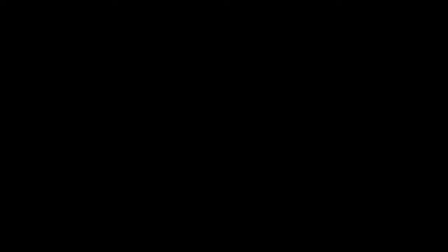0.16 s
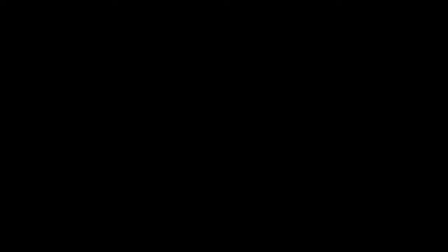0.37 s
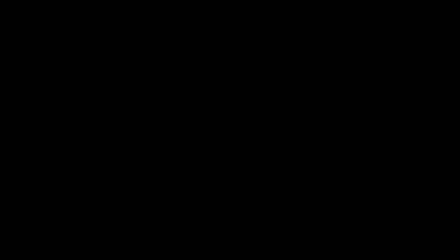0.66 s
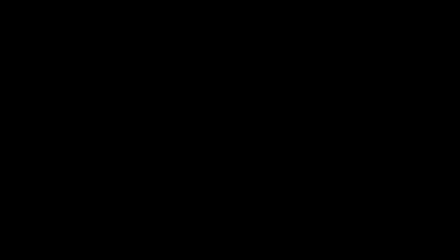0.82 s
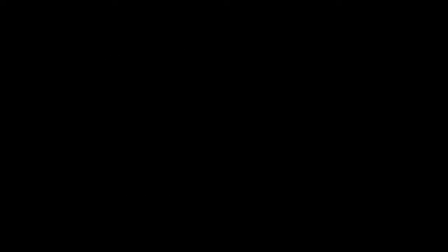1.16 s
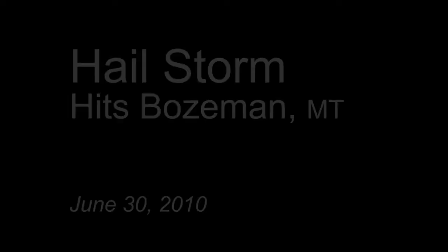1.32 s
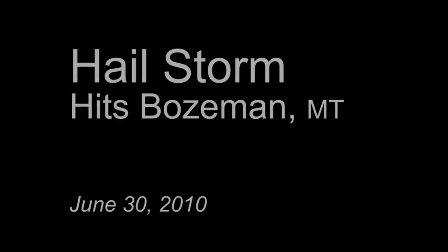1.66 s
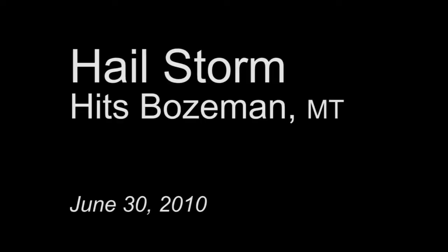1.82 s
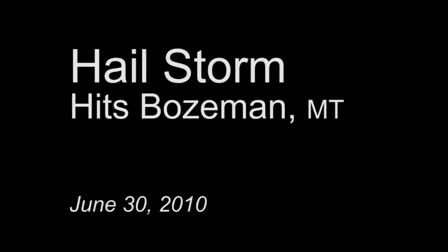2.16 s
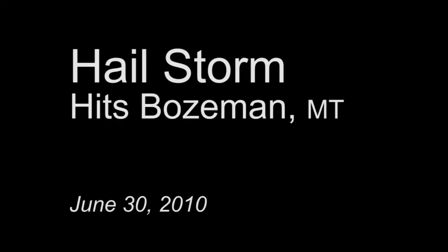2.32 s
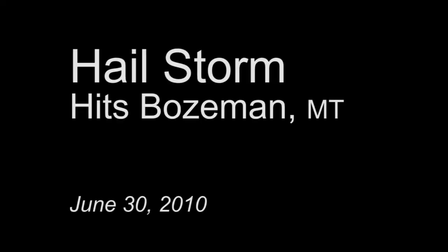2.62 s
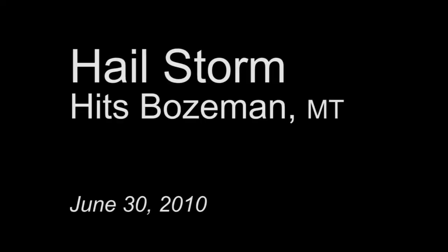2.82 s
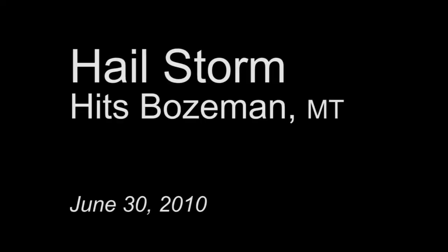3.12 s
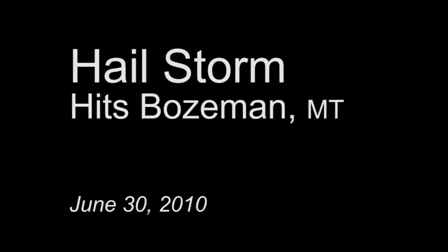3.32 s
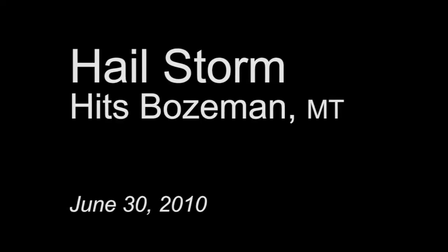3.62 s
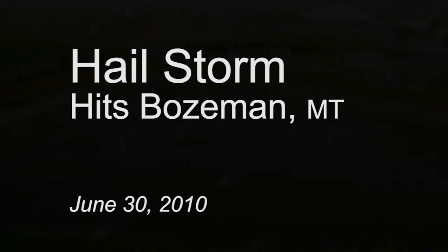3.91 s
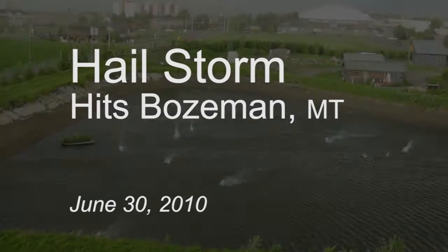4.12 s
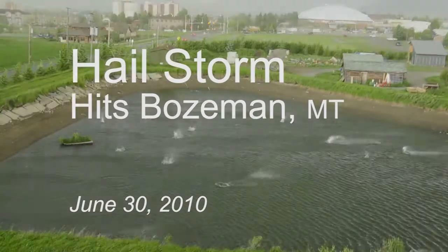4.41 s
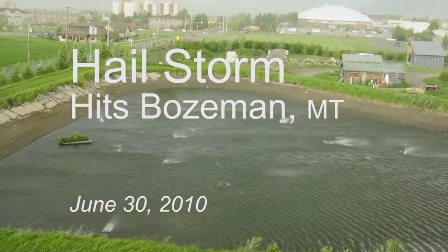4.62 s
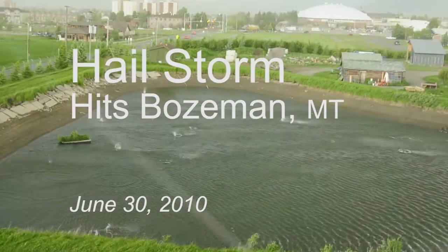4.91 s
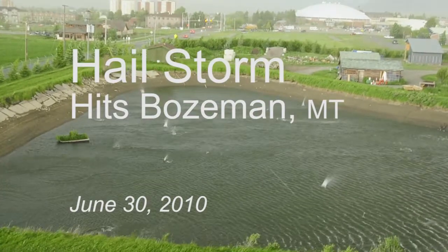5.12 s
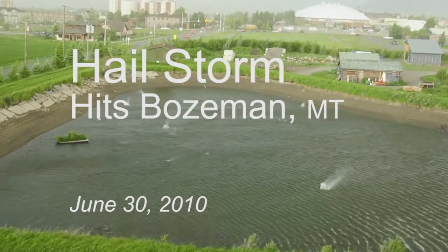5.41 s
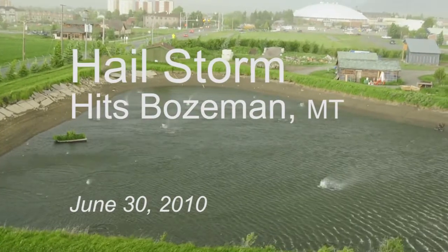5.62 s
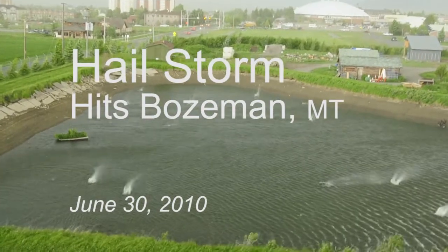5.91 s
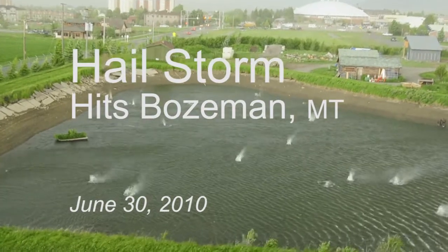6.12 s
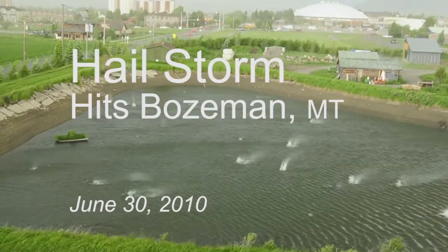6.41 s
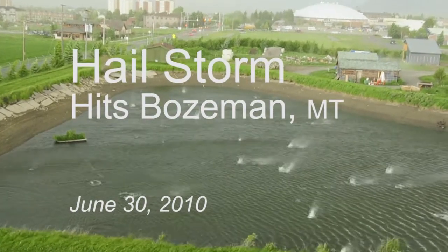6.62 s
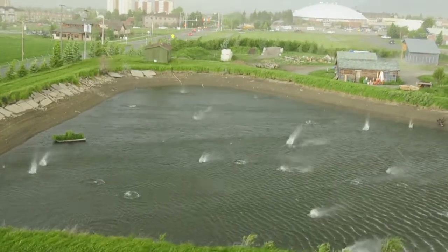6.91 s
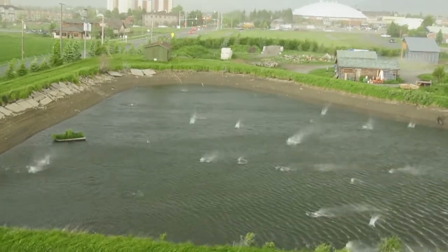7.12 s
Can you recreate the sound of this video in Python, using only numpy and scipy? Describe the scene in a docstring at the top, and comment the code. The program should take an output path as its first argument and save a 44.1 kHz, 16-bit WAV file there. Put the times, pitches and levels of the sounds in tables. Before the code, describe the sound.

Large hail hits a sheet roof, heard from beneath in a hollow shelter beside a pond. A low, uneven drumming of distant hail runs throughout with a faint mid-range patter. A hard crack lands at 0.35 seconds, a lesser one at 0.8, then strong blows at 1.2 and 1.55, with weaker taps around them. A tight cluster bangs from 2.25 to 2.5, two more knocks near 2.85, then heavy hits at 3.25 and 3.4. From 4.0 to 4.6 blows come thick and fast and the patter swells. The loudest smacks fall between 5.3 and 5.55, followed by bursts around 6.1, a heavy bang at 6.55 and one at 6.9, then fainter taps to 7.3. Each blow cracks brightly and dies within a fraction of a second into a boomy, slightly metallic ring. The close microphone lacks high treble and flattens on peaks.

```python
"""Large hail on a sheet roof

Hailstones strike a sheet roof over a hollow shelter beside a pond, heard from below.
Each near blow is a bending wave, a bright smack of ice, noise bands that ring on in sheet and hollow,
and struck modes. Far blows melt into a low drumming and a patter, made of noise bands with small decays.
The pickup is narrow-band and overloads."""
import sys
import numpy as np
from scipy import signal
from scipy.fft import irfft
from scipy.io import wavfile

SR = 44100
rng = np.random.default_rng(int(sys.argv[2]) if len(sys.argv) > 2 else 0)


def voltage_ratio(level):
    """Linear amplitude factor for a level in decibels (scalar or array-like)."""
    return 10 ** (np.asarray(level, float) / 20)


def bounce(signal):
    """Save signal as a 16-bit WAV file at the path given by the first command-line argument."""
    frames = np.transpose(np.atleast_2d(signal))
    limited = np.clip(frames, -1, 1)
    pcm = np.round(limited * 32767).astype(np.int16)
    wavfile.write(sys.argv[1], SR, pcm)


N = 320166  # length in samples

# The storm far off. Each row: time in seconds, drumming level in dB, patter level in dB.
STORM = [(0.0, -27.5, -35.5), (0.4, -26, -47), (0.71, -25, -40), (1.29, -21.5, -29), (2.1, -23.5, -36.5),
         (2.47, -19, -26), (2.61, -20, -34.5), (3.21, -24, -43), (3.35, -20, -30.5), (3.84, -23, -38),
         (4.27, -17, -23), (4.47, -20.5, -20.5), (4.71, -19.5, -32.5), (5.22, -24, -35.5), (5.42, -16, -38),
         (5.86, -20.5, -35), (6.13, -18, -27.5), (7.26, -21.5, -35)]
# Colour of the drumming. Each row: frequency in Hz, relative level in dB per Hz.
DRUMMING = [(22, -27.5), (42, -22.5), (62, -9), (105, -18), (146, -1), (209, -4), (280, 0), (375, -3.5),
            (452, -3.5), (671, -9.5), (977, -19), (1500, -28), (1950, -48), (3300, -92.5)]
# Colour of the patter. Each row: frequency in Hz, relative level in dB per Hz.
PATTER = [(500, -17.5), (1000, 1), (1600, -4), (2350, -3.5), (3850, -19.5), (4800, -24.5), (5400, -34.5)]
# Near blows. Each row: time in seconds, relative peak level in dB, centre of the crack in Hz,
# treble lift in dB, level of the smack against the ring in dB.
BLOWS = [(0.253, -28, 2100, -1, -6), (0.3599, 4, 2300, 9, -2), (0.796, -0.5, 2020, -0.5, -3),
         (0.991, -21, 2910, 1.5, 1.5), (1.034, -11, 2190, -2.5, -5.5), (1.151, -20.5, 1780, 2.5, 4),
         (1.1937, 6.5, 3300, 0.4, -12), (1.4458, -12, 1700, -5.5, 18.5), (1.5614, 5, 2030, 0, 2),
         (1.6695, -10, 2030, -1.5, 3), (1.75, -18, 1700, -9, 11), (2.1826, -23.5, 1790, -25, -7),
         (2.2381, -18, 3280, 2, -18), (2.2647, 7, 2234, 4, -22), (2.381, -2.5, 2210, -11.5, 9.5),
         (2.4447, 4, 2305, 9, -4), (2.4711, 3.5, 2324, 1, -8), (2.8317, -3.5, 1710, -4, -11),
         (2.8839, -1.5, 2000, 1.2, 0), (3.1992, -21, 2230, -13, -2.1), (3.2649, 6, 2250, 7.5, 2),
         (3.426, 3, 1975, -5, -12), (3.5086, -10.5, 2270, 1.3, 11), (3.7215, -18, 1870, -7.5, -6),
         (3.7544, -14.5, 1490, 5, -6), (3.81, -16.5, 1700, 1, 3), (3.9842, 5, 1990, -5.5, -9),
         (4.0593, -10, 2060, 6.5, -6), (4.173, 0.5, 3020, 8.5, 3.5), (4.214, 5.5, 3100, -0.5, 3),
         (4.3272, 5.5, 2190, 7, -16), (4.4444, -1.5, 2320, -11, -1), (4.492, -4.5, 2030, -20.5, 1.1),
         (4.533, 3, 2110, -7, -5.5), (4.581, 5.5, 2030, -0.5, 8), (4.6907, -11, 2060, -3, 5),
         (4.895, -3.5, 1700, -4, -9), (5.0697, -22, 2320, -2, -1), (5.2642, -18.5, 2240, -7.5, -4),
         (5.2979, -0.8, 2150, -5, 2), (5.3271, 9.5, 2330, 5, 11.5), (5.4653, 5, 2370, 10.5, -6),
         (5.4884, 2, 2166, -1.2, -11), (5.523, 9.5, 2230, 3.5, -11), (5.5694, -18, 2220, -5, -5),
         (5.8412, -17, 1510, 8, -3), (5.903, -0.9, 2080, -1.2, -4), (6.0698, 5.5, 2034, -7, -1),
         (6.145, -12, 2040, 7, -2), (6.177, 2.3, 2840, 6.5, 6.5), (6.2585, 2, 2870, 6, 2),
         (6.44, -24, 1470, -19, -16.5), (6.5082, -22.5, 1830, 6.5, -2.1), (6.551, 8.5, 3180, -0.5, -7),
         (6.768, -22, 1840, -13, 0), (6.8556, -15, 1690, -3.5, -4), (6.916, 5, 2030, 2, -6),
         (7.0261, -10.5, 2050, -0.5, 3), (7.1731, -20, 1560, -25, -7)]
# What the struck sheet radiates. Each row: frequency in Hz, relative level in dB per Hz.
SHEET = [(90, -27), (200, -8.5), (680, -6.5), (1100, -6), (1500, -3), (2100, -3), (3100, -4), (4000, -22),
         (4700, -19), (5400, -15.5), (6200, -35.5)]
# How long the sheet rings across the range. Each row: frequency in Hz, factor on the ring time.
LINGER = [(150, 2.9), (400, 2.86), (1000, 0.83), (2200, 1.12), (5000, 0.5)]
# Strongest modes of the sheet. Each row: frequency in Hz, relative level in dB,
# 60 dB decay time in seconds (sheet_modes() holds it to 0.2 at most).
SHEET_MODES = [(171.6, -4, 0.98), (310, -3.5, .4), (424.8, -5.5, 0.33), (686, -3.5, .4), (936, -19, 0.5),
               (1107, -10.5, 0.3), (1395, -2, .2), (1466, -8, 0.33), (1700, -6, 0.32), (1826, -1.5, 0.22),
               (2030, 1.5, 0.12), (2184, -0.5, 0.18), (2230, 1, 0.37), (2300, -6.5, 0.3), (2380, -8, 0.32),
               (2620, -8, 0.19), (2830, -3.5, 0.32), (2870, -0.5, 0.14), (3180, -19.5, 0.3),
               (4430, -27.5, 0.11)]

STEP = 16  # samples per envelope point
EDGES = 25 * 2 ** np.arange(0, 8.1, 1 / 3)  # third-octave band edges, Hz
CENTRES = np.sqrt(EDGES[1:] * EDGES[:-1])
SPREAD = 1  # bending waves arrive after SPREAD / sqrt(Hz) seconds
LEAD_S = 0.0036  # a blow starts this long before its steepest rise
RING_T60_S, RISE_S = 0.24, 0.0019  # base ring time and base rise time of the sheet
HOLLOW_DB, HOLLOW_T60_S = -21, 0.54
# Faint (far) and dull blows carry more boom: lift at 0 dB, dB per dB of peak, dB per dB of treble.
BOOM_DB, BOOM_PER_PEAK, BOOM_PER_TREBLE = 3.5, -0.21, -0.3
# Dull blows die sooner; a hard smack sends a strong first wave.
RING_S_PER_TREBLE_DB, WAVE_PER_SMACK = 0.0049, 0.25


def rms_one(x):
    """Scale to unit rms."""
    return x / np.sqrt(np.mean(x ** 2) + 1e-20)


def at_hz(points, hz):
    """Read a table on a log-frequency axis."""
    points = np.array(points)
    return np.interp(np.log(hz), np.log(points[:, 0]), points[:, 1])


def drift(rate_hz):
    """Slow random wander on the envelope grid, spread 1."""
    r = np.exp(-2 * np.pi * STEP * rate_hz / SR)
    white = rng.standard_normal(N // STEP + 4001)
    slow = signal.lfilter([1], [1, -2 * r, r * r], white)[4000:]  # skip the filter's start
    return rms_one(slow)


def played(power):
    """Third-octave noise bands, each following its own row of power per Hz."""
    white = rng.standard_normal((2, N + SR))  # neighbouring bands take different noise
    out = 0
    for k, row in enumerate(power):
        band_pass = signal.butter(2, EDGES[k:k + 2], "band", fs=SR, output="sos")
        band = signal.sosfilt(band_pass, white[k % 2])[SR:]
        envelope = np.interp(np.arange(N) / STEP, np.arange(len(row)), np.sqrt(row))
        out = out + band * envelope
    return out


def far_blows(spectrum, per_s, t60, steady, patchy_db):
    """Small random blows, each a short decay over all bands, on a steady share of melted ones; rms 1."""
    count = N // STEP + 1
    struck = rng.random(count) < per_s * STEP / SR
    sizes_db = 4.5 * np.minimum(rng.exponential(1, count), 4)
    sizes = voltage_ratio(2 * sizes_db) * struck
    taps = signal.lfilter([1], [1, -voltage_ratio(-120 * STEP / SR / t60)], sizes)
    taps = steady + (1 - min(steady, 1)) * taps / taps.mean()
    rows = [taps * voltage_ratio(2 * (at_hz(spectrum, hz) + patchy_db * drift(5.8))) for hz in CENTRES]
    return rms_one(played(rows))


def blow_colour(hz, peak_db, centre_hz, treble_db):
    """The sheet's spectrum in dB, bent by where and how hard the stone lands."""
    crack_db = 4.46 * np.exp(-.5 * (np.log2(hz / centre_hz) / 0.23) ** 2)
    top = np.clip(np.log2(hz / 2500) / .5, 0, 1)
    bottom = np.clip(np.log2(1300 / hz) / 0.23, 0, 1)
    boom_db = BOOM_DB + BOOM_PER_PEAK * peak_db + BOOM_PER_TREBLE * treble_db
    return at_hz(SHEET, hz) + crack_db + top * treble_db + bottom * boom_db


def arrival(hz):
    """Delay in seconds of a bending wave behind its 5 kHz part: highs travel faster."""
    return SPREAD * (1 / np.sqrt(np.maximum(hz, 150)) - 1 / np.sqrt(5000))


def ringing(level_db):
    """After each blow every band swells, dies fast in the sheet and slowly in the hollow."""
    power = np.zeros((len(CENTRES), N // STEP + 1))
    length = SR // STEP  # each blow rings for up to one second
    hz = CENTRES[:, None]
    for s, peak_db, centre_hz, treble_db, smack_db in BLOWS:
        first = int((s - LEAD_S) * SR / STEP)
        since_start = (first + np.arange(length)) * STEP / SR - s + LEAD_S
        t = np.maximum(since_start - 0.21 * arrival(np.clip(hz, 2000, 5000)), 0)
        rise = 1 - np.exp(-t / (RISE_S + 0.14 * np.maximum(arrival(hz), 0)))
        # the ice shatters: short and bright
        smack = voltage_ratio(2 * smack_db - 120 * t / 0.059) * np.minimum(hz / 2800, 1.4) ** 2.8
        ring_t60 = max(RING_T60_S + RING_S_PER_TREBLE_DB * treble_db, .08) * at_hz(LINGER, hz)
        sheet = voltage_ratio(-120 * t / ring_t60)
        hollow = voltage_ratio(2 * HOLLOW_DB - 120 * t / HOLLOW_T60_S)
        colour = voltage_ratio(2 * (peak_db + blow_colour(hz, peak_db, centre_hz, treble_db)))
        blow = rise ** 2 * (smack + sheet + hollow) * colour
        power[:, first:first + length] += blow[:, :power.shape[1] - first]
    clumps = [voltage_ratio(2 * 1.1 * drift(37)) for hz in CENTRES]  # echoes arrive unevenly, band by band
    return voltage_ratio(level_db) * played(power * clumps)


def first_wave(level_db):
    """The direct bending wave of each blow: a click drawn out into a short fall through the treble."""
    size, ahead = 2048, 256  # samples; the wave is placed this far ahead to leave room before it
    out = np.zeros(N + size)
    hz = np.maximum(np.arange(size // 2 + 1) * SR / size, 1)
    delay = arrival(np.clip(hz, 2000, 5000)) + ahead / SR
    phase = -2 * np.pi * np.cumsum(delay) * SR / size
    thin = 1 / (1 + (1800 / hz) ** 4)  # slow low waves radiate little
    for s, peak_db, centre_hz, treble_db, smack_db in BLOWS:
        colour = voltage_ratio(blow_colour(hz, peak_db, centre_hz, treble_db))
        sweep = irfft(thin * colour * np.exp(1j * phase), size)
        at = round(s * SR) - ahead
        # faint blows land far off and lose more of their first wave
        wave_db = peak_db + WAVE_PER_SMACK * smack_db + 0.26 * min(peak_db, 0)
        out[at:at + size] += voltage_ratio(wave_db) * sweep / np.abs(sweep).max()
    return voltage_ratio(level_db) * out[:N]


def sheet_modes(level_db):
    """Each blow strikes every mode, a decaying sine, with a strength and sign of its own."""
    s, peak_db, centre_hz, treble_db, smack_db = np.transpose(BLOWS)
    luck = rng.standard_normal((len(BLOWS), len(SHEET_MODES)))
    out = np.zeros(N)
    for k, (hz, mode_db, t60) in enumerate(SHEET_MODES):
        clicks = np.full(N, 1e-18)  # a trace of input keeps the filter from vanishing numbers
        bend_db = blow_colour(hz, peak_db, centre_hz, treble_db) - at_hz(SHEET, hz)
        clicks[np.round(s * SR).astype(int)] = luck[:, k] * voltage_ratio(peak_db + mode_db + bend_db)
        r = voltage_ratio(-60 / (min(t60, 1 / 5) * SR))
        w = 2 * np.pi * hz / SR
        out += signal.lfilter([0, np.sin(w)], [1, -2 * r * np.cos(w), r * r], clicks)
    return voltage_ratio(level_db) * out


def scene():
    """Near blows over the far storm."""
    s, *columns = np.transpose(STORM)
    drumming_db, patter_db = [np.interp(np.arange(N) / SR, s, c) for c in columns]
    drumming = voltage_ratio(drumming_db) * far_blows(DRUMMING, per_s=60.0, t60=0.23, steady=0.68, patchy_db=2.5)
    patter = voltage_ratio(patter_db) * far_blows(PATTER, per_s=45.0, t60=0.063, steady=0.66, patchy_db=4.0)
    near = ringing(level_db=1.5) + first_wave(level_db=-4.5) + sheet_modes(level_db=-22.5)
    return (near + drumming + patter)[None]


def low_pass(x):
    """Removes everything above the highest recorded frequency."""
    return signal.sosfilt(signal.butter(12, 15800, fs=SR, output="sos"), x)


def record(dry):
    """The microphone fades toward the band edge; overload flattens the peaks before the steep cut."""
    fade = signal.cheby2(12, 60, 5650, fs=SR, output="sos")
    faded = signal.sosfilt(fade, dry)
    squeezed = faded / (1 + np.abs(faded / .88) ** 10) ** (1 / 10)
    steep_cut = signal.ellip(10, 1, 80, 5520, fs=SR, output="sos")
    narrow = signal.sosfilt(steep_cut, squeezed)
    mix = np.clip(narrow, -.99, .99)  # overshoot of the cut is clipped just under full scale
    return low_pass(mix)


dry = scene()
out = record(dry)
bounce(out)
```